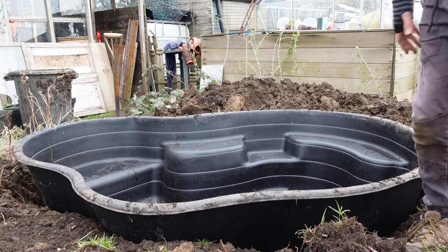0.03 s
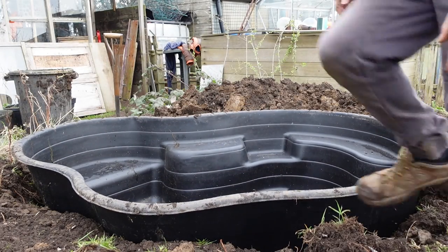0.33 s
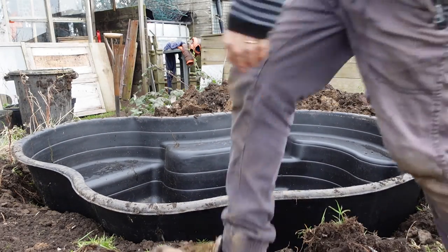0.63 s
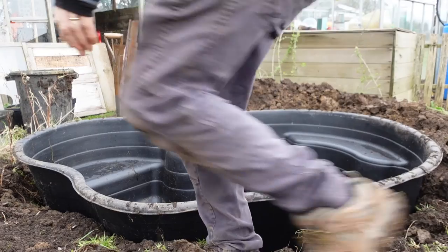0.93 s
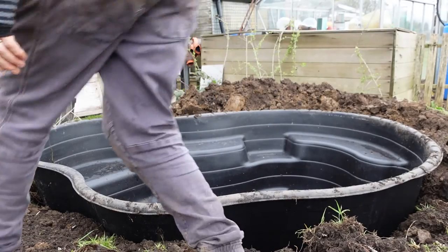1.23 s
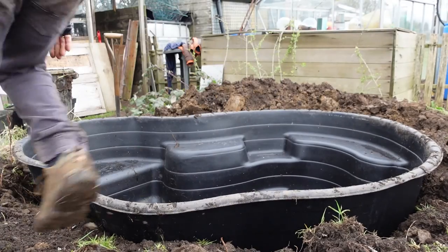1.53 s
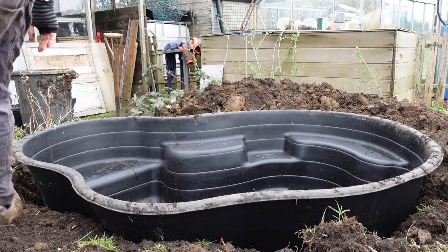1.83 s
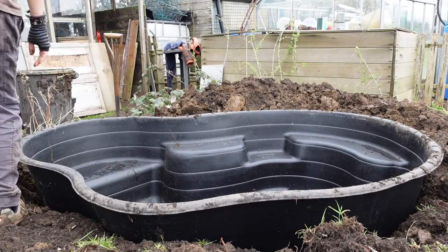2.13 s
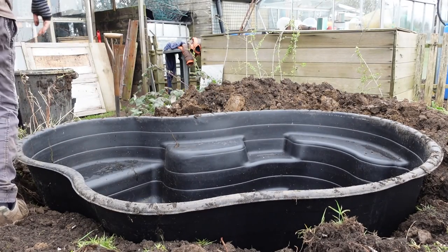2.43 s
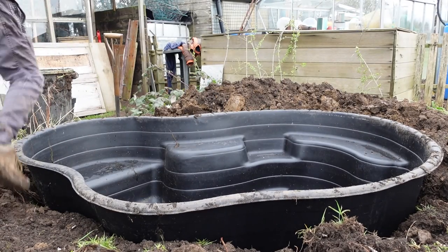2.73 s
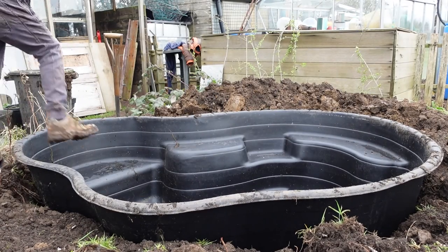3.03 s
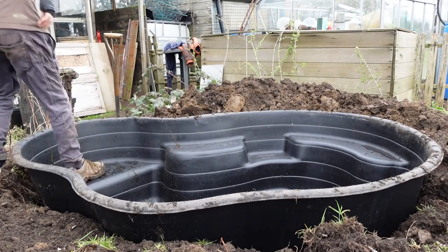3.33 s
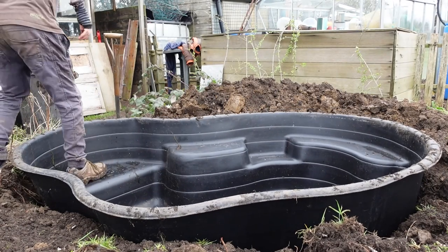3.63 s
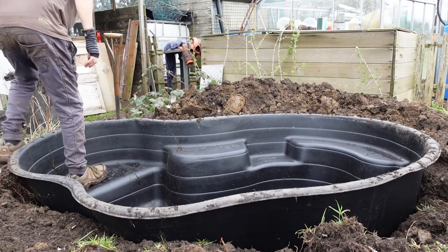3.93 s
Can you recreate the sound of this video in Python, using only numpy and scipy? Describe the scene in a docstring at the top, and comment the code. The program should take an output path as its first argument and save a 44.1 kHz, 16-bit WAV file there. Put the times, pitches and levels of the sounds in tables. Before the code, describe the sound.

Footsteps on soil with swishing trousers, ending in hollow thumps on a plastic pond shell.

```python
"""Far traffic hisses throughout; a low engine hum, there from the start, slowly fades away. Distant birds
whistle and short hollow notes sound far off as someone in work trousers walks over soft soil: cloth swishes,
soles scuff, stones click and boots land dully. A small bird chirps nearby, and a faint ticking comes from afar.
At 3.3 s the walker steps into a hollow plastic pond liner. The shell thumps and rings in its modes, the gritty
sole slides on it, and it thumps again as the weight settles."""
import sys
import numpy as np
from scipy import signal
from scipy.fft import rfft, irfft, next_fast_len
from scipy.io import wavfile
from scipy.ndimage import map_coordinates

SR = 44100
rng = np.random.default_rng(int(sys.argv[2]) if len(sys.argv) > 2 else 0)


def pcm_store(signal):
    """Save signal as 16-bit PCM."""
    levels = np.round(np.clip(np.atleast_2d(signal), -1, 1) * 32767)
    wavfile.write(sys.argv[1], SR, levels.astype(np.int16).T)


N = 176400
T = np.arange(N) / SR
NEAR_SIDE_DB, TOP_HZ = -16, 15750


def amp(db):
    """Decibels to amplitude ratio."""
    return 10 ** (np.asarray(db) / 20)


def unit(x):
    """Normalisation to rms 1."""
    return x / np.sqrt(np.mean(x ** 2) + 1e-20)


def since(start):
    """Time elapsed since start, zero before it."""
    return np.maximum(T - start, 0)


def fade(start, attack, t60):
    """Damped envelope: a quick rise, and exponential decay by 60 dB in t60 seconds."""
    return (1 - np.exp(-since(start) / attack)) * amp(-60 * since(start) / t60)


def filtered(x, response):
    """Linear filtering: the spectrum of x is multiplied by a frequency response."""
    size = next_fast_len(N + SR // 2)
    return irfft(rfft(x, size) * response(np.fft.rfftfreq(size, 1 / SR)), size)[..., :N]


def equalise(x, points):
    """Spectral shaping by (Hz, dB) points joined on a logarithmic frequency axis."""
    freqs, db = np.transpose(points)
    return filtered(x, lambda hz: amp(np.interp(np.log(hz + 1), np.log(freqs), db)))


def colour(x, points):
    """Spectral shaping, normalised to rms 1."""
    return unit(equalise(x, points))


def white():
    """Two uncorrelated white noises: middle and side."""
    return rng.standard_normal((2, N))


def spread(pair, side_db):
    """Sum and difference turn middle and side into left and right."""
    return pair[0] + amp(side_db) * np.array([pair[1], -pair[1]])


def noise_band(hz, width_hz):
    """A noise pair of rms 1 in a Gaussian band."""
    return unit(filtered(white(), lambda f: np.exp(-.5 * ((f - hz) / width_hz) ** 2)))


def wobble(rate):
    """Smooth random modulation with rate knots a second."""
    return map_coordinates(rng.standard_normal(int(N * rate / SR) + 4), [T * rate])


def grains(rate, noise_db, scatter_db):
    """Shot noise: random tiny impacts of uneven size over a bed of white noise."""
    sizes = white() * amp(scatter_db * rng.uniform(-1.6, 1, N))
    return unit(sizes * (rng.random(N) < rate / SR)) + amp(noise_db) * white()


# Spectrum of the traffic. Each row: frequency in Hz, relative level in dB.
TRAFFIC_SPECTRUM = [(15, -74), (25, -39), (69, -8), (101, -8.5), (164, -9), (188, -10), (289, -12.5),
                    (421, -12.5), (703, -10), (945, 0.5), (1340, -3), (1710, -4.5), (2920, -19),
                    (3720, -19.5), (4150, -18), (5010, -22), (15500, -31)]
# Course of its loudness. Each row: time in seconds, level in dB.
TRAFFIC_LEVELS = [(0, -54), (1.5, -54), (2.6, -54.5), (3.1, -55), (4, -52.5)]


def traffic():
    """Incoherent addition: far vehicles merge into broadband hiss, a little to the right."""
    hiss = spread(colour(white(), TRAFFIC_SPECTRUM), side_db=-7.5)
    level_db = np.interp(T, *np.transpose(TRAFFIC_LEVELS)) + 0.64 * wobble(7.93)
    pan = amp([[-0.33], [0.33]])
    return hiss * amp(level_db) * pan


# Fading of the engine. Each row: time in seconds, level in dB.
HUM_LEVELS = [(0, -54), (.6, -55), (1, -59), (1.4, -66.5), (2, -74), (3, -77.5), (4, -91)]


def engine_hum(hz=77, waver_hz=3.6):
    """Nearly periodic vibration: an engine radiates a wavering fundamental and its octave."""
    phase = 2 * np.pi * np.cumsum(hz + waver_hz * wobble(20)) / SR
    tone = np.sqrt(2) * (np.sin(phase) + amp(-13) * np.sin(2 * phase))
    level_db = np.interp(T, *np.transpose(HUM_LEVELS)) + 2.6 * wobble(14.6)
    return tone * amp(level_db)


# Distant whistles and short hollow notes. Each row: start in seconds, level in dB, pitch in Hz, # length in
# seconds, pitch waver in Hz.
FAR_TONES = [(-.12, -50, 1810, 0.37, 70), (0.77, -52, 1868, 0.1, 110), (1.077, -55, 500, 0.041, 40),
             (1.564, -47, 590, 0.019, 37), (1.565, -42.5, 505, 0.033, 15), (1.59, -55, 495, 0.036, 12),
             (1.642, -56, 511, 0.042, 40), (2.139, -62, 2290, 0.021, 150), (2.234, -56, 2360, 0.03, 140),
             (2.353, -58, 2550, .025, 143), (2.83, -57, 4000, 0.077, 50), (2.91, -67, 4260, .12, 120),
             (3.132, -64, 4520, .08, 70)]


def far_tones():
    """Random modulation of pitch and amplitude blurs each distant tone into a narrow band."""
    out = np.zeros(N)
    for start, db, hz, length, waver_hz in FAR_TONES:
        progress = np.clip((T - start) / length, 0, 1)
        swell = np.sqrt(np.abs(np.sin(np.pi * progress)))
        phase = 2 * np.pi * np.cumsum(hz + waver_hz * wobble(400)) / SR
        out += amp(db) * swell * np.sin(phase) * amp(2 * wobble(70))
    return out


# Swings of the legs. Each row: peak time in seconds, half width in seconds, trouser level in dB,
# sole level in dB.
STRIDES = [(.04, 0.11, -64, -55.5), (.2, 0.049, -55, -61), (.42, 0.11, -55.5, -69),
           (.66, 0.075, -58.5, -55), (0.811, .045, -55.5, -49.5), (.98, 0.14, -59, -61),
           (1.27, 0.088, -59, -64), (1.38, 0.071, -59, -55.5), (1.6, 0.059, -59.5, -73),
           (1.9, 0.074, -62, -62), (2.5, 0.048, -67.5, -68), (3.96, 0.021, -50.5, -59)]
# Spectra of rubbing cloth and scuffed soil. Each row: frequency in Hz, relative level in dB.
CLOTH_SPECTRUM = [(100, 7.5), (400, -2.5), (900, 2.5), (2000, -9.5), (3000, -4.5), (6500, -3.5),
                  (9000, -9.5), (15000, -21.5)]
SCUFF_SPECTRUM = [(100, -3.5), (450, -5), (900, -1.5), (1900, -1), (2700, -3), (4500, -9.5), (8000, -20),
                  (15000, -40)]


def strides():
    """Friction noise: cloth swishes and the sole scuffs soil; overlapping strides add in power."""
    cloth = spread(colour(white(), CLOTH_SPECTRUM), NEAR_SIDE_DB) * amp(1.5 * wobble(60))
    crumbs = grains(rate=2500, noise_db=0, scatter_db=0.5)
    scuff = spread(colour(crumbs, SCUFF_SPECTRUM), NEAR_SIDE_DB) * amp(1.7 * wobble(80))
    swings = np.array([np.exp(-((T - peak) / width) ** 2) for peak, width, _, _ in STRIDES])
    _, _, cloth_db, scuff_db = np.transpose(STRIDES)
    return cloth * np.sqrt(amp(cloth_db) ** 2 @ swings) + scuff * np.sqrt(amp(scuff_db) ** 2 @ swings)


# Clods, grit and stones knocked by the boots. Each row: start in seconds, level in dB, pitch in Hz,
# relative crumbling level in dB, crumbling t60 in seconds.
STONE_KNOCKS = [(0.114, -40, 7500, -2, 0.0091), (0.123, -51, 8050, 6.5, 0.0073),
                (0.378, -43.5, 7850, 1, 0.011), (0.5443, -35.5, 970, -2, .025), (.62, -27, 1190, -17, 0.17),
                (0.661, -21, 1060, -25.5, 0.22), (1.197, -49.5, 2140, 5.5, .012),
                (1.784, -50, 2460, 0, .015), (1.919, -41, 1530, -5, 0.021), (2.536, -51, 5500, 1.5, 0.014),
                (3.284, -53, 5500, 4, 0.021), (3.38, -31, 5640, -13, 0.017), (3.447, -49, 4470, -5, .025),
                (3.848, -46.5, 4800, 4, 0.019), (3.961, -51, 8600, 8.5, 0.032)]


def stones():
    """Heavy damping: each impact gives a dead ping and a little crumbling noise."""
    out = np.zeros((2, N))
    for start, db, hz, crumble_db, crumble_t60 in STONE_KNOCKS:
        ping = fade(start, attack=0.0004, t60=0.0097) * np.sin(2 * np.pi * hz * since(start))
        crumble = fade(start, 0.00077, crumble_t60) * spread(noise_band(hz, .5 * hz), NEAR_SIDE_DB)
        out += amp(db) * (ping + amp(crumble_db) * crumble)
    return out


def garden_echo(x):
    """Reverberation: reflections from fences and sheds form a short impulse response."""
    tail = (white() * fade(start=0.014, attack=0.002, t60=.25))[:, :SR // 2]
    tail /= np.linalg.norm(tail[0])
    echo = signal.fftconvolve(x.mean(axis=0)[None], tail, axes=1)[:, :N]
    return spread(echo, side_db=-26)


# Boots landing. Each row: start in seconds, level in dB.
FOOTFALLS = [(.38, -48.5), (0.625, -39), (1.253, -50), (1.52, -53.5), (1.965, -51), (2.411, -48.5)]
# Spectrum of the thud. Each row: frequency in Hz, relative level in dB.
THUD_SPECTRUM = [(40, -18), (100, -11.5), (230, -2), (400, -21), (900, -39), (3000, -42)]


def footfalls():
    """Inelastic impact: soft soil stops the boot gradually, so the thud is mostly bass."""
    envelope = sum(amp(db) * fade(start, attack=.004, t60=0.094) for start, db in FOOTFALLS)
    return envelope * spread(colour(white(), THUD_SPECTRUM), side_db=-24)


# Chirps of a small bird. Each row: start in seconds, level in dB, top pitch in Hz, length in seconds.
BIRD_CHIRPS = [(1.643, -55.5, 4530, .018), (2.279, -49, 4380, 0.022), (3.25, -50.5, 4160, 0.028),
               (3.875, -42, 4400, 0.021), (3.963, -38.5, 4160, 0.024)]


def near_bird(sweep=0.44, top_at=0.736):
    """Frequency sweep: a pure tone climbs a parabola and levels off late in the chirp."""
    out = np.zeros(N)
    for start, db, top_hz, length in BIRD_CHIRPS:
        progress = np.clip((T - start) / length, 0, 1)
        pitch = top_hz * (1 - sweep * (1 - progress / top_at) ** 2)
        swell = np.abs(np.sin(np.pi * progress ** 1.22))
        out += amp(db) * swell * np.sin(2 * np.pi * np.cumsum(pitch) / SR)
    return out


# Faint ticking in the distance. Each row: start in seconds, level in dB.
FAR_TICKS = [(2.626, -49), (2.72, -44), (2.834, -44), (3.145, -45)]


def far_ticks():
    """Transients: narrow-band noise that decays rapidly is heard as a dry tick."""
    envelope = sum(amp(db) * fade(start, attack=0.00033, t60=.04) for start, db in FAR_TICKS)
    return spread(envelope * noise_band(hz=1720, width_hz=200), side_db=-4)


# The boot loading the liner. Each row: start in seconds, flex level in dB, panel pitch in Hz,
# swell time in seconds, ring level in dB, slap level in dB, slap cutoff in Hz.
LINER_LOADS = [(3.308, -11, 232, 0.0074, -28, -26.5, 11900), (3.32, -20, 88, 0.016, -52, -55, 2000),
               (3.341, -17, 298, 0.0037, -39.5, -33, 7000), (3.345, -9.5, 183, 0.011, -39.5, -66, 2000),
               (3.363, -23.5, 113, 0.014, -42, -52, 2000), (3.387, -18, 200, 0.0031, -45.5, -33, 6000),
               (3.397, -23, 124, 0.0076, -51, -52, 6000), (3.674, -29, 262, 0.002, -48, -33.5, 1695),
               (3.684, -17, 194, 0.0083, -48, -51, 900)]
# Normal modes of the shell. Each row: frequency in Hz, relative level in dB, t60 in seconds.
SHELL_MODES = [(63.2, -16, 0.81), (92.8, -4, 0.76), (115.7, -0.5, 0.55), (158.6, -1.5, 0.45),
               (178.4, 5, 0.4), (201, -9, .4), (244.5, 0, 0.28), (282, 2, 0.091), (390.5, 4.5, 0.12),
               (430.4, 6, 0.1), (499, -5, 0.19), (592.4, -12.5, 0.33), (646, -11, 0.22), (777, -16, 0.17)]
# Spectrum of the surface slap. Each row: frequency in Hz, relative level in dB.
SLAP_SPECTRUM = [(150, 4), (400, 5.5), (560, -2.5), (800, 2.5), (1050, -4.5), (1350, -0.5), (1900, -16),
                 (2500, -12.5), (3200, -23), (4200, -16), (7000, -26.5), (15000, -40)]


def liner_thumps(overtone_ratio=1.7, overtone_db=-17.5, ring_attack_s=0.0041):
    """Modal vibration: each load briefly flexes a panel, rings the shell and slaps its surface."""
    out = np.zeros((2, N))
    surface = spread(colour(white(), SLAP_SPECTRUM), side_db=-18)
    for start, flex_db, hz, swell, ring_db, slap_db, cutoff_hz in LINER_LOADS:
        t = since(start)
        phase = 2 * np.pi * hz * t
        panel = np.sin(phase) + amp(overtone_db) * np.sin(overtone_ratio * phase)
        flex = (t / swell * np.exp(1 - t / swell)) ** 3.5 * panel
        modes = sum(amp(db - 60 * t / t60) * np.sin(2 * np.pi * f * t) for f, db, t60 in SHELL_MODES)
        ring = modes * (1 - np.exp(-t / ring_attack_s))
        slap = amp(slap_db) * fade(start, attack=0.00085, t60=0.06) * surface
        lowpass = signal.butter(2, cutoff_hz, fs=SR)
        out += amp(flex_db) * flex + amp(ring_db) * ring + signal.lfilter(*lowpass, slap + 1e-12)
    return out


# The sole slipping on the liner. Each row: start in seconds, grit level in dB, rise in seconds,
# hold in seconds, release t60 in seconds, rumble level in dB.
SOLE_SLIDES = [(3.354, -39.5, 0.034, 0.065, 0.19, -35), (3.459, -58.5, .02, 0.12, 0.2, -49.5),
               (3.762, -47.5, 0.082, 0.025, 0.48, -46)]
# Spectra of the grit and the rumbling shell. Each row: frequency in Hz, relative level in dB.
GRIT_SPECTRUM = [(200, -19), (700, 7.5), (1000, -1), (1500, 2.5), (2100, -3), (2700, -0.5), (3500, -7.5),
                 (5600, -8.5), (8000, -19.5), (15000, -33)]
RUMBLE_SPECTRUM = [(40, -24), (80, -19), (110, -5), (180, -1), (260, -8), (420, -12.5), (600, -29),
                   (1500, -44.5)]


def sole_slides(sag_db_per_s=35):
    """Sliding friction: grit grinds and forces the shell to rumble, easing as the sole slows."""
    impacts = grains(rate=1600, noise_db=-3.5, scatter_db=0)
    grit = spread(colour(impacts, GRIT_SPECTRUM), NEAR_SIDE_DB) * amp(1.6 * wobble(120))
    rumble = colour(white(), RUMBLE_SPECTRUM)[0]
    out = np.zeros((2, N))
    for start, grit_db, rise, hold, t60, rumble_db in SOLE_SLIDES:
        sag_db = sag_db_per_s * since(start + rise)
        release_db = 60 * since(start + rise + hold) / t60
        stroke = np.minimum(since(start) / rise, 1) * amp(-sag_db - release_db)
        out += stroke * (amp(grit_db) * grit + amp(rumble_db) * rumble)
    return out


def scene():
    """Superposition: all sources add, with a weak echo of the stones, near bird and liner."""
    distant = traffic() + engine_hum() + far_tones() + far_ticks()
    walk = strides() + footfalls()
    near = stones() + near_bird() + liner_thumps() + sole_slides()
    return distant + walk + near + amp(-17) * garden_echo(near)


# Stereo width of the microphone pair. Each row: frequency in Hz, side gain in dB.
SIDE_RESPONSE = [(30, -4), (100, -3), (250, 4), (500, 3), (1000, -1), (4000, 2.5), (8000, 3), (13000, -8.5)]


def record(dry):
    """Mid-side filtering narrows the bass and top treble; band limiting cuts both extremes."""
    mid = (dry[0] + dry[1]) / 2
    side = equalise((dry[0] - dry[1]) / 2, SIDE_RESPONSE)
    stereo = np.array([mid + side, mid - side])
    return filtered(stereo, lambda hz: (hz < TOP_HZ) * (1 - 0.82 * np.exp(-(hz / 55) ** 8)))


dry = scene()
out = record(dry)
pcm_store(out)
```